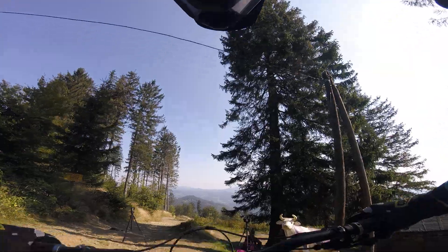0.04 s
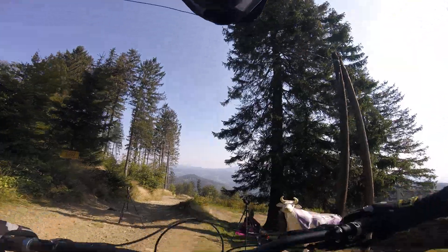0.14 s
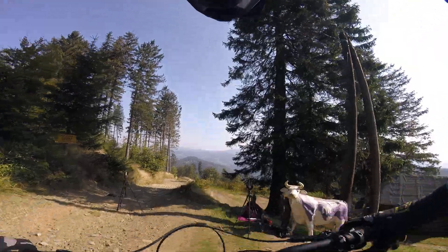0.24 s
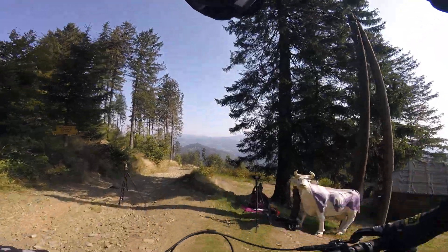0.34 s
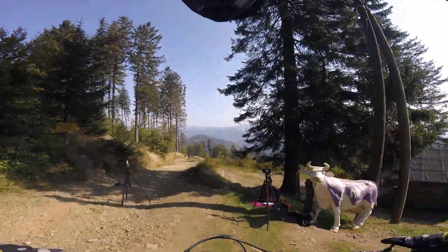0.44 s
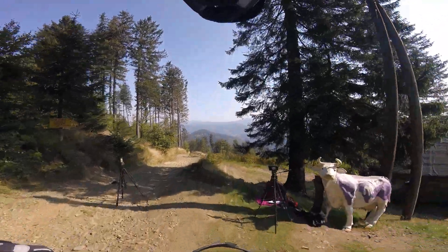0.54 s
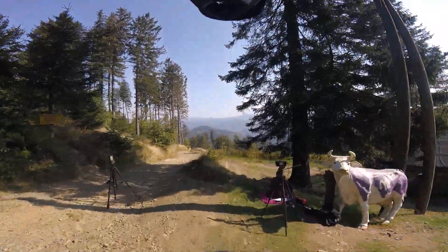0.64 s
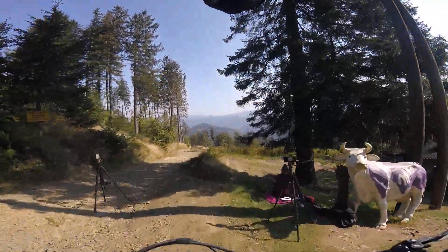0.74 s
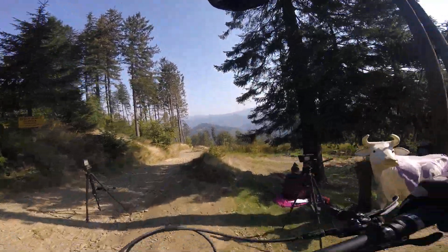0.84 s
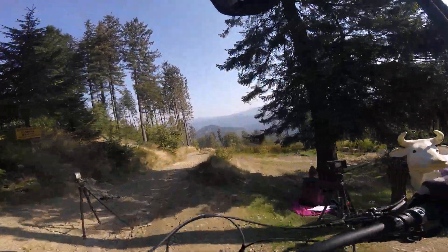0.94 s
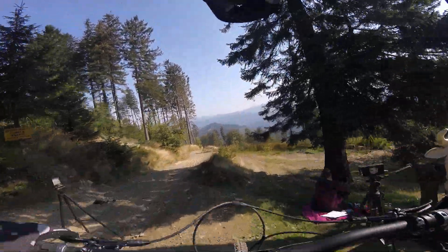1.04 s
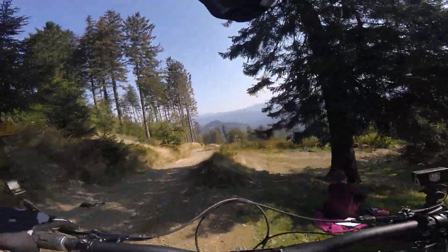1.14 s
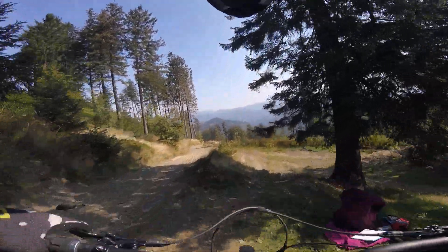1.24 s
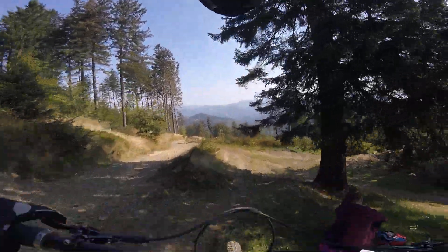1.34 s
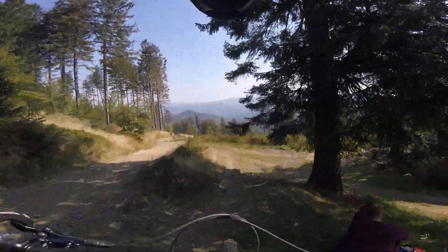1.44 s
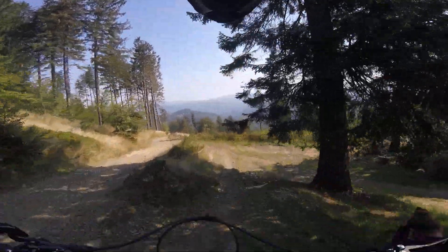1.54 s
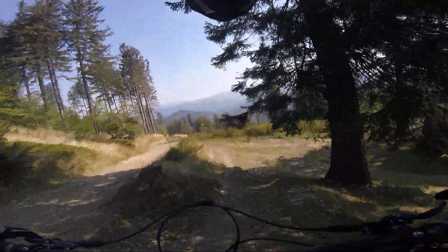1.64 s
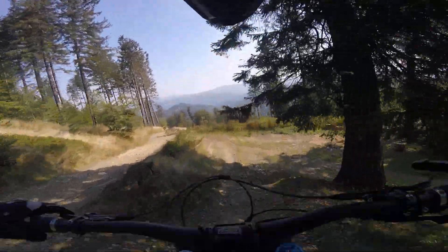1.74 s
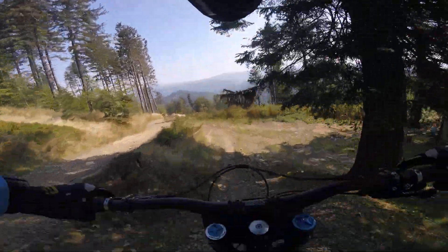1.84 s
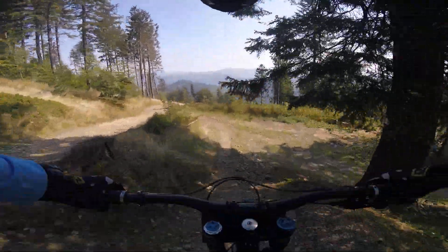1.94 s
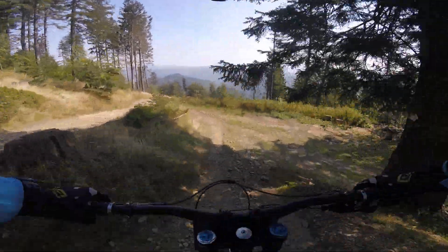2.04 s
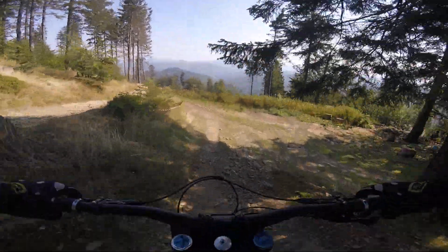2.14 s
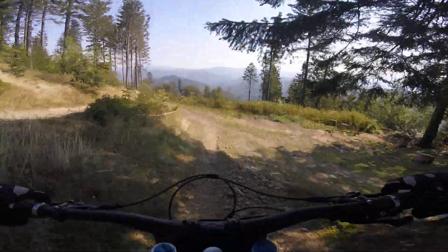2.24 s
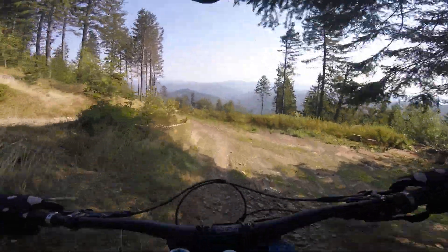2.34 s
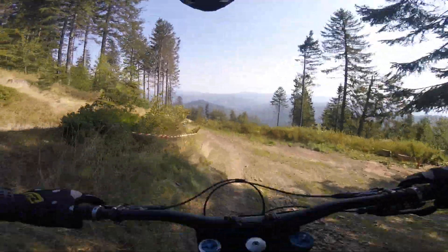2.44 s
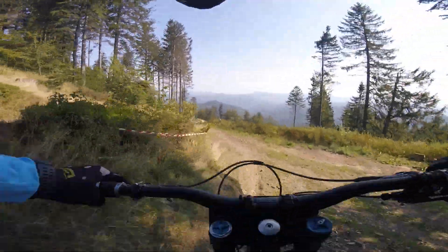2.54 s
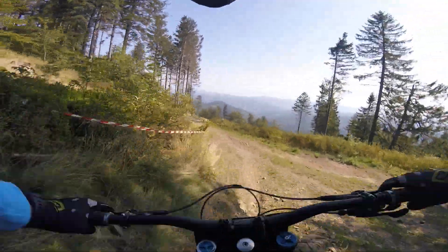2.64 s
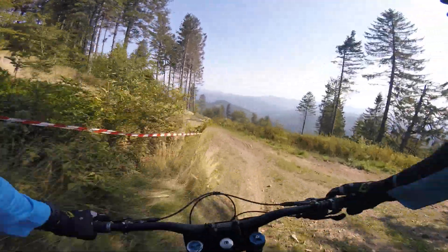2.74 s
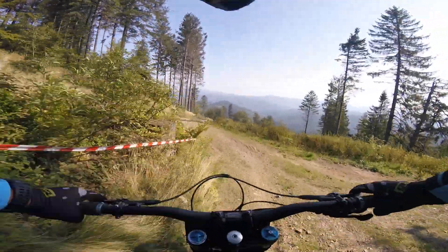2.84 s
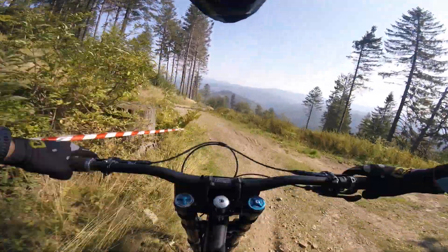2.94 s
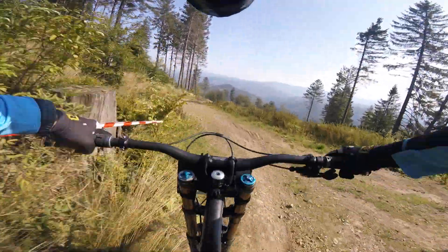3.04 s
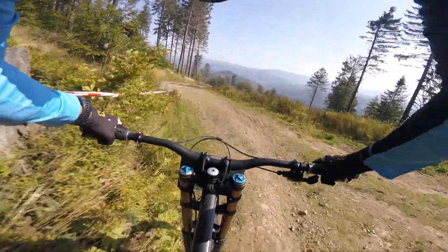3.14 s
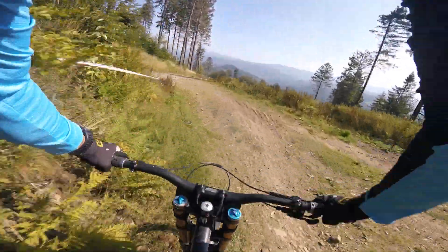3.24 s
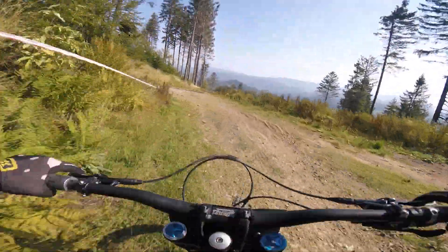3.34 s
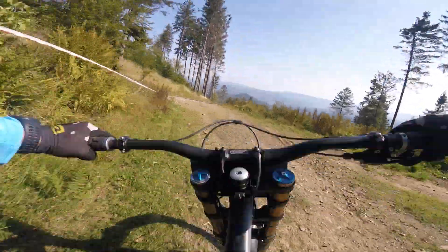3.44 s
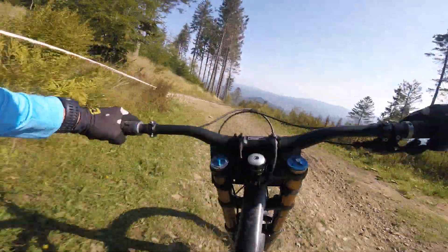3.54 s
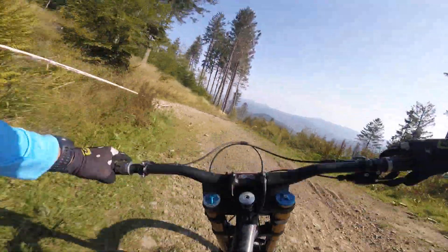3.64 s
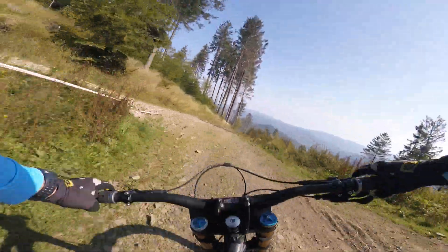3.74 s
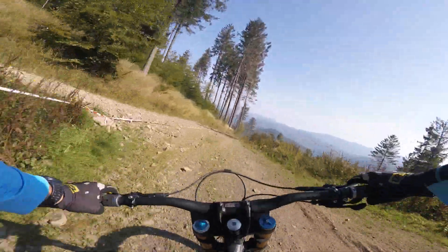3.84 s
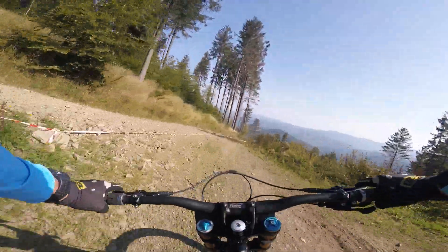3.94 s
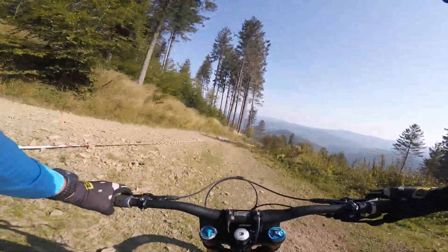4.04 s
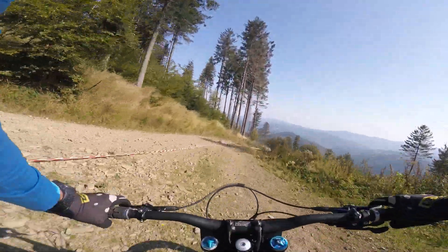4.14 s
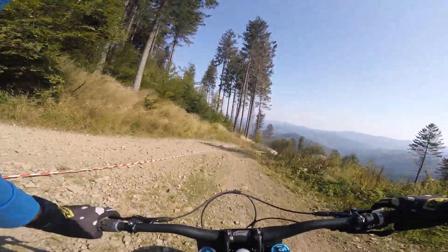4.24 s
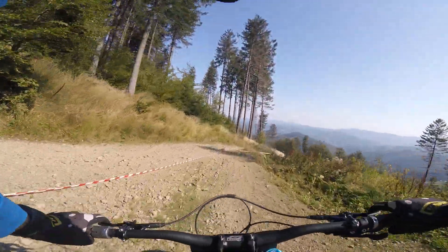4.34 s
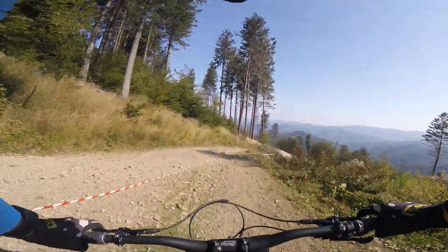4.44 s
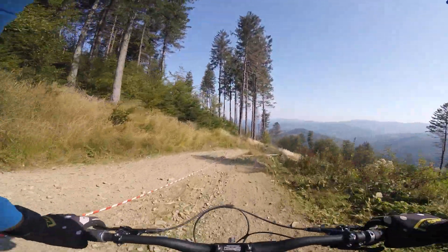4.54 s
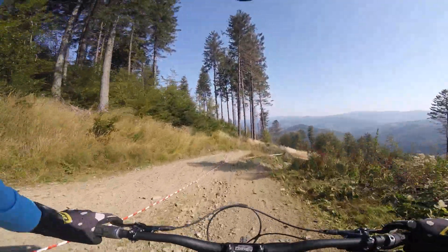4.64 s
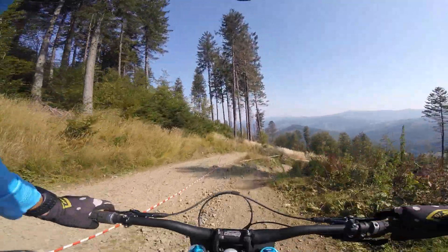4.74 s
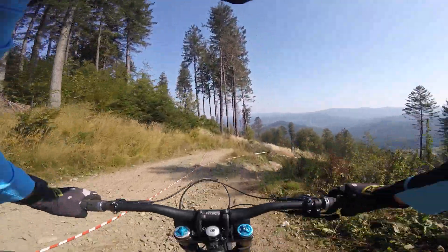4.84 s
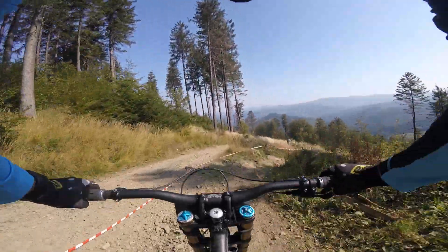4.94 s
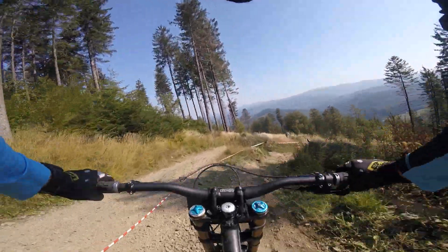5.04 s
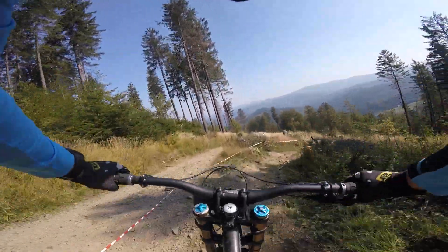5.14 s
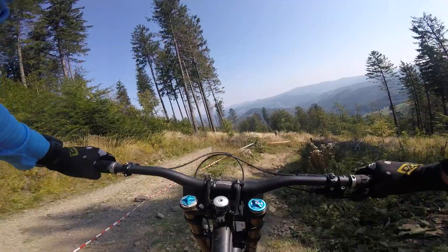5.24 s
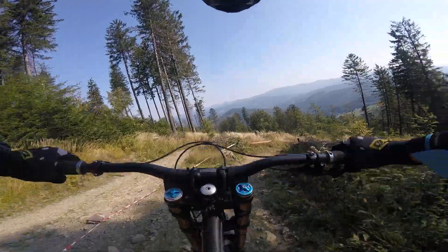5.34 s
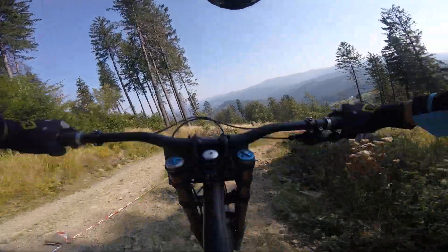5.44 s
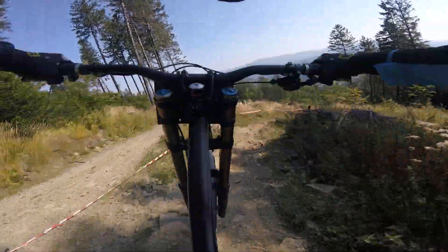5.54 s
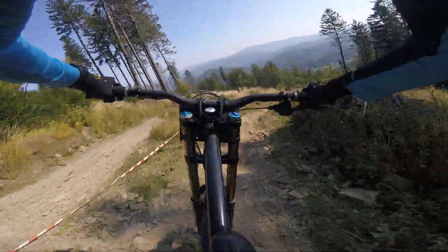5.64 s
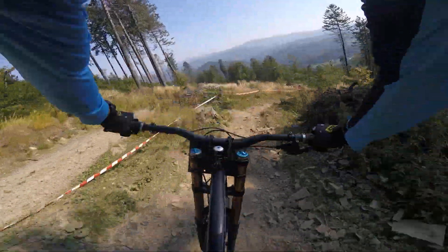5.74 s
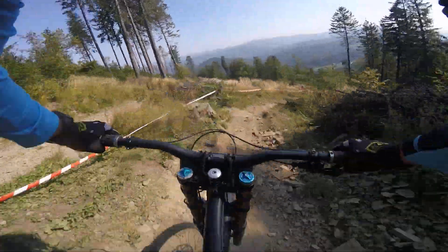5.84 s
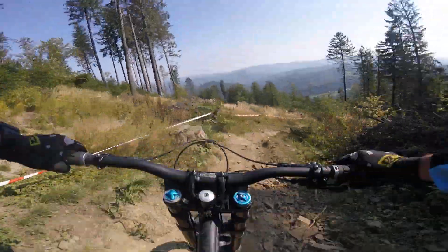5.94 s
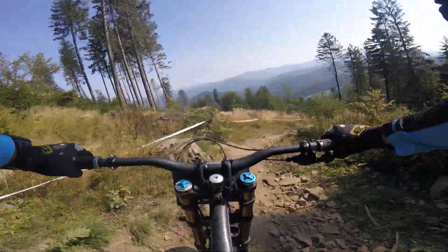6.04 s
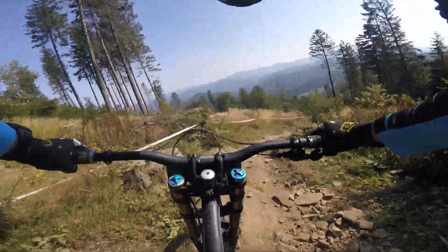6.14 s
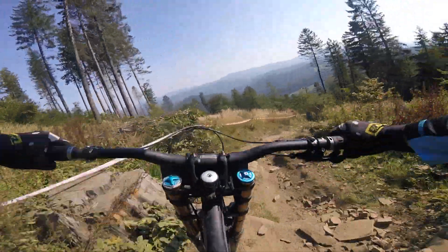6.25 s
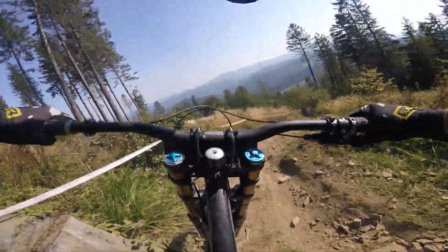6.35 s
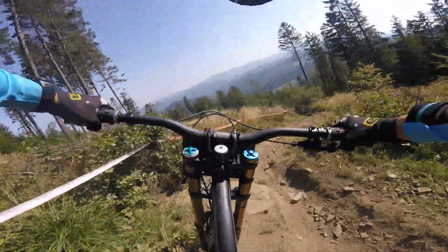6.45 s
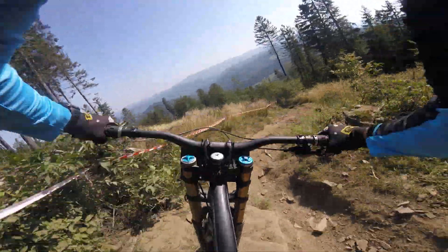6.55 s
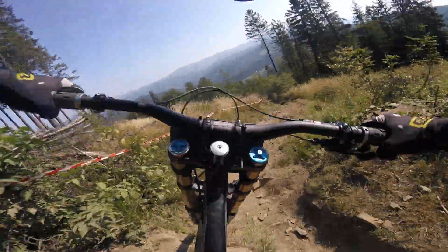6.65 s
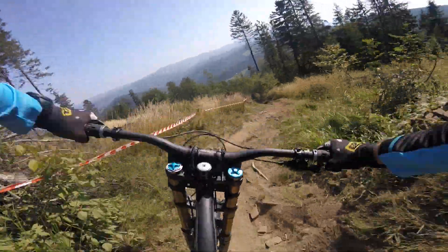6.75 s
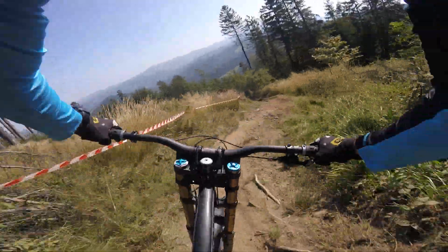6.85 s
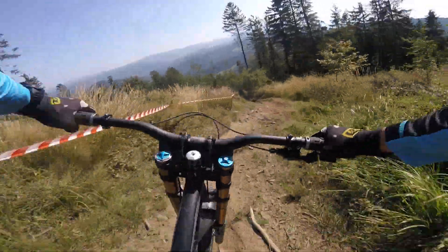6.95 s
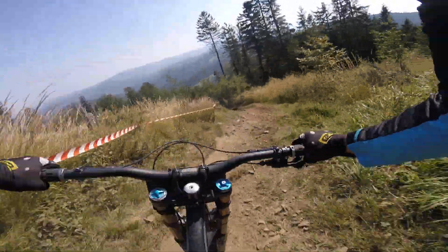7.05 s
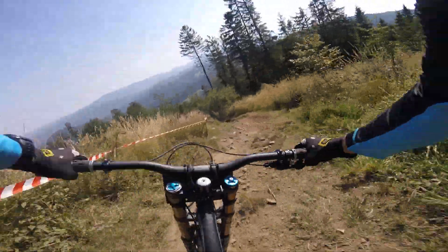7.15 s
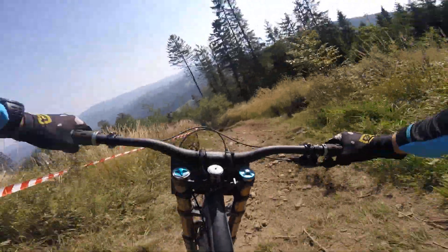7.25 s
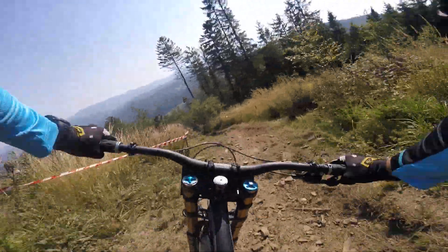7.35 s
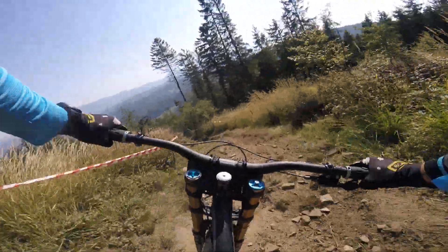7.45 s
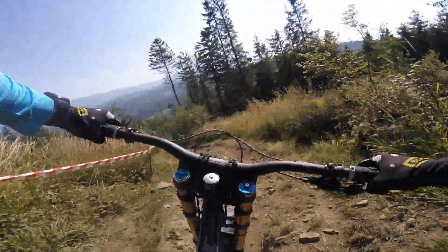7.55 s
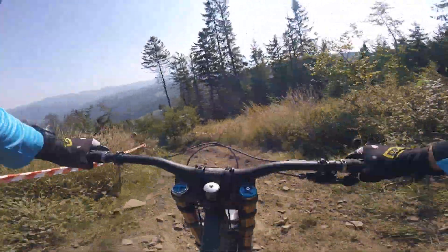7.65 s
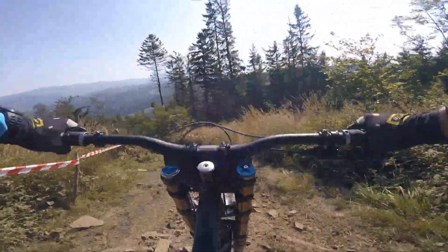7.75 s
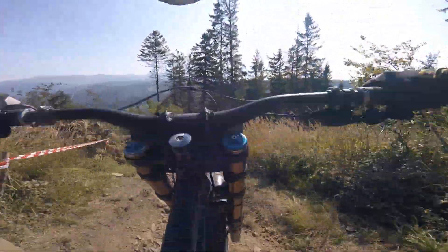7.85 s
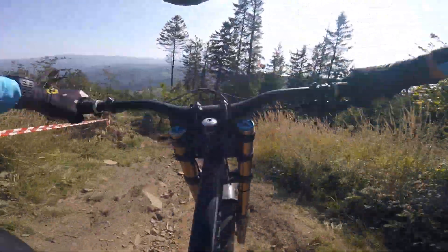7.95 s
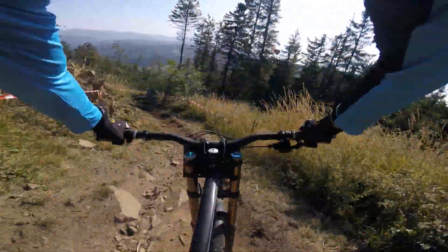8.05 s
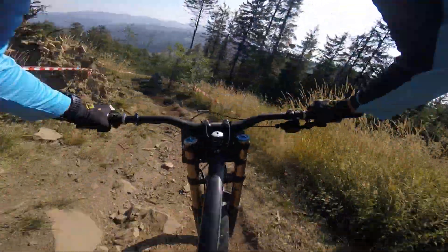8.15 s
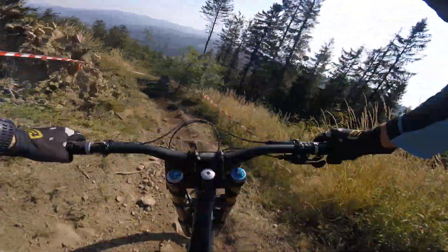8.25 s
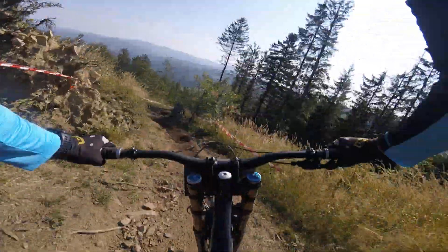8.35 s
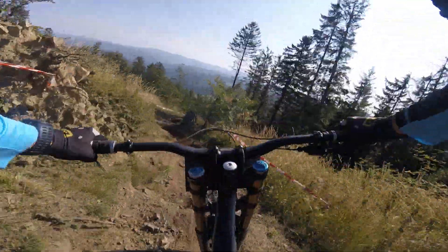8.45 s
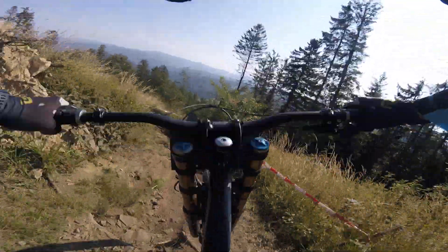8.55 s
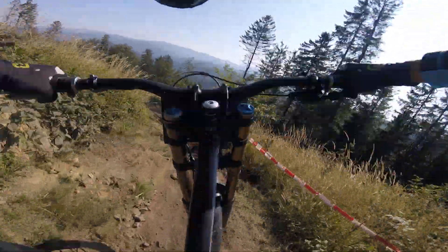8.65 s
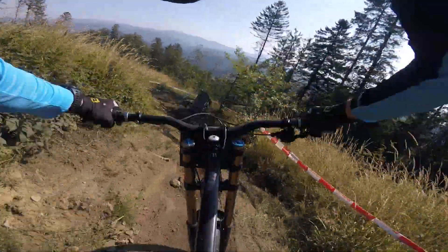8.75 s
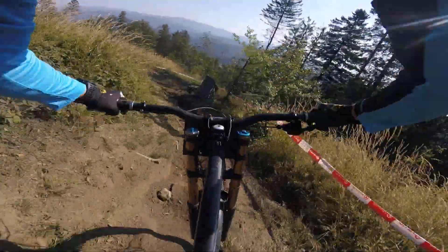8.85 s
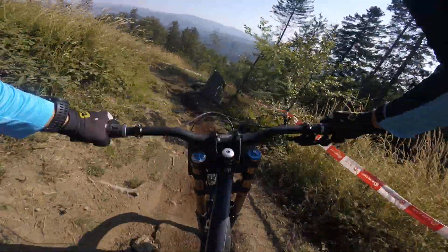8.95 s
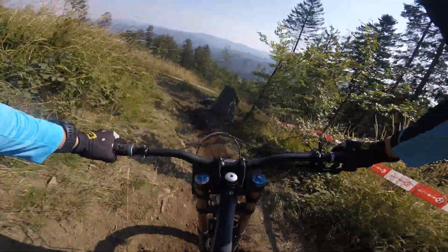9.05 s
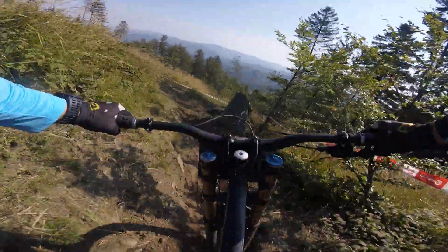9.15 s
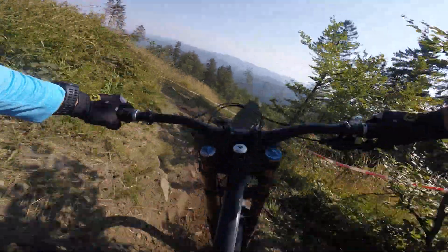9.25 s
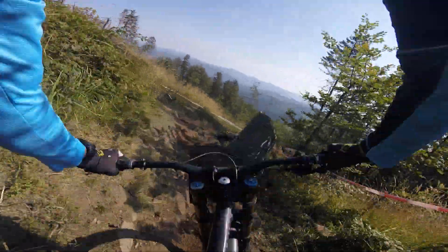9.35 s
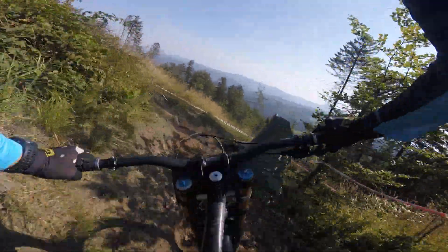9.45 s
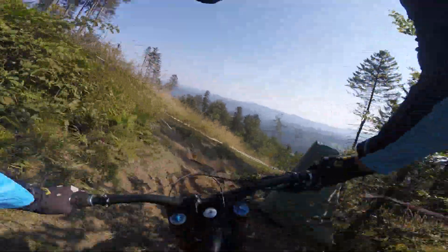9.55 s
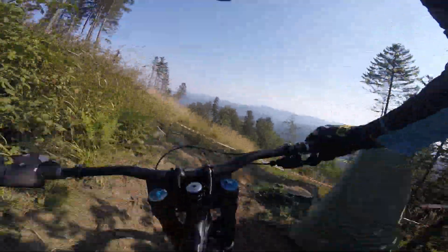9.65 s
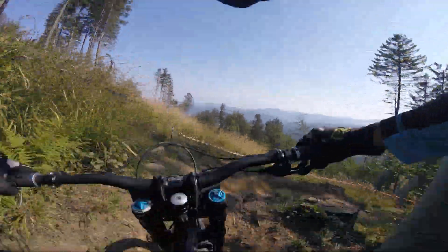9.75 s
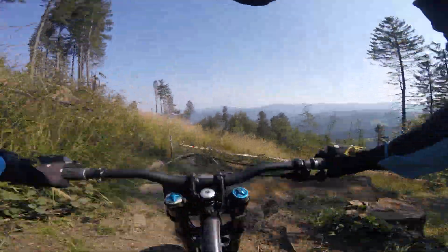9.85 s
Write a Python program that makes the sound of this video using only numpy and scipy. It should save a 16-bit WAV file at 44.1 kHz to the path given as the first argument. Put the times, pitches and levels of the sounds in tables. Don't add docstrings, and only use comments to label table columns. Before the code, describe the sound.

Rattling downhill bike ride: a soft rolling start with freewheel ticks, then hard knocks, clinking chain, drumming tyres and heavy low wind rumble.

```python
import sys
import numpy as np
from scipy import signal
from scipy.fft import rfft, irfft, next_fast_len
from scipy.io import wavfile
from scipy.ndimage import uniform_filter1d, minimum_filter1d

SR = 44100
rng = np.random.default_rng(int(sys.argv[2]) if len(sys.argv) > 2 else 0)


def voltage_ratio(level):
    return 10 ** (np.asarray(level, float) / 20)


def file_out(sig):
    cols = np.atleast_2d(sig).T
    lim = np.clip(cols, -1, 1)
    pcm = np.round(lim * 32767).astype(np.int16)
    wavfile.write(sys.argv[1], SR, pcm)


N = 436590


def evened(x):
    return x / np.sqrt(np.mean(x ** 2) + 1e-20)


def curve(rows, column):
    rows = np.asarray(rows)
    return np.interp(np.arange(N) / SR, rows[:, 0], rows[:, column])


def coloured(x, spectrum):
    size = next_fast_len(N)
    freq_hz, level_db = np.transpose(spectrum)
    bins_hz = np.fft.rfftfreq(size, 1 / SR)
    shape_db = np.interp(np.log(bins_hz + 1), np.log(freq_hz + 1), level_db, -90, -90)
    return evened(irfft(rfft(x, size) * voltage_ratio(shape_db), size)[:N])


def flicker(per_s):
    steps = rng.standard_normal(4000)
    return np.interp(np.arange(N) / SR * per_s, np.arange(4000), steps) * 1.23


def grit(per_s, spread_db, tail_s):
    size = voltage_ratio(spread_db * np.minimum(rng.exponential(1, N), 4))
    hits = size * (rng.random(N) < per_s / SR)
    return signal.lfilter([1], [1, -np.exp(-1 / (tail_s * SR))], hits)


def band(x, centre_hz, width):
    low_hz = centre_hz / (1 + width)
    high_hz = min(centre_hz * (1 + width), 0.45 * SR)
    return signal.sosfilt(signal.butter(2, [low_hz, high_hz], "bandpass", fs=SR, output="sos"), x)


def add(mix, start_s, sound, peak_db):
    part = mix[round(start_s * SR):][:len(sound)]
    part += voltage_ratio(peak_db) * (sound / abs(sound).max())[:len(part)]


# start_s [s], gust_db [dB], drum_db [dB]
RIDE = [(0.0, -35.5, -32), (0.63, -31, -38), (0.8, -25, -31), (0.99, -27, -37.5), (1.6, -18, -27.5),
        (2.18, -17.5, -16.5), (2.59, -13, -15), (3.06, -16, -17.5), (3.08, -14, -4), (3.2, -22, -29),
        (3.25, -22, -6), (3.36, -15.5, -34), (3.47, -22.5, -19), (3.67, -15.5, -15), (3.69, -20, -19),
        (4.38, -13.5, -15.5), (4.52, -16, -15.5), (4.6, -14, -16.5), (5.27, -9.5, -19.5), (5.65, -19, -17),
        (5.71, -9, -25.5), (6.4, -14, -25.5), (6.81, -12.5, -21.5), (7.17, -12, -32), (7.25, -11, -9),
        (7.44, -13, -24), (8.05, -11.5, -23), (8.13, -8, -23), (8.22, -10, -29), (8.3, -15.5, -8),
        (8.43, -13, -30), (8.55, -18.5, -18.5), (8.6, -10, -20), (8.66, -20, -34), (8.71, -12, -15),
        (8.88, -11.5, -26), (8.93, -19.5, -27), (9.18, -14, -34), (9.26, -19.5, -21.5), (9.4, -9.5, -35),
        (9.48, -20, -21), (9.57, -13, -29), (9.9, -13.5, -38)]
# start_s [s], crunch_db [dB], fizz_db [dB]
TRAIL_SURFACE = [(0.0, -52, -59), (0.44, -59.5, -63.5), (0.66, -49, -61), (0.93, -50.5, -59),
                 (1.07, -43, -52), (1.18, -48, -57.5), (1.46, -41.5, -53.5), (1.76, -46.5, -55.5),
                 (2.07, -38.5, -51.5), (2.23, -40, -55.5), (2.34, -35, -49), (2.53, -36, -49),
                 (2.76, -30, -46.5), (2.89, -36, -46.5), (3.03, -38.5, -50.5), (3.22, -46.5, -61),
                 (3.45, -43, -52.5), (3.69, -36.5, -50.5), (4.0, -41.5, -51.5), (4.3, -39, -48),
                 (4.63, -37, -49.5), (4.99, -36, -48.5), (5.35, -28, -47), (5.54, -33, -49),
                 (5.73, -32, -48), (6.01, -33, -51), (6.15, -35, -51), (6.64, -36, -51.5),
                 (6.84, -36.5, -51), (7.5, -32, -50), (7.69, -32, -49), (8.0, -35, -47), (8.11, -36, -52),
                 (8.38, -36, -52), (8.68, -34, -49), (9.13, -35.5, -50), (9.23, -33.5, -49.5),
                 (9.43, -33, -50.5), (9.57, -36, -50.5), (9.9, -37.5, -51)]
# start_s [s], ticks_per_s [1/s]
PAWL_RATE = [
    (0, 28),
    (2.5, 59),
    (4.2, 67),
    (4.7, 72),
    (5.1, 63),
    (9.9, 75),
]
# freq_hz [Hz], level_db [dB per Hz]
DRUM_SPECTRUM = [(26, -27), (45, -3), (76, -1.5), (221, -11.5), (280, -17), (373, -19), (519, -28),
                 (702, -35), (1200, -39), (1560, -54), (2640, -120)]
# freq_hz [Hz], level_db [dB per Hz]
CRUNCH_SPECTRUM = [(260, -12), (450, -1.5), (521, -2), (706, -10), (957, -8), (1220, -9), (1450, -11),
                   (1670, -11.5), (1850, -8), (2280, -11), (2960, -18.5), (3850, -20.5), (4320, -26.5),
                   (5500, -31), (7150, -74), (12100, -120)]
# freq_hz [Hz], level_db [dB per Hz]
FIZZ_SPECTRUM = [(1760, -34), (3000, -2.5), (3860, -6.5), (4260, -9.5), (6040, -5.5), (10300, -14.5),
                 (11900, -28.5), (14900, -22), (15600, -38), (16000, -55)]


def tyres():
    jolts = evened(grit(per_s=70, spread_db=7, tail_s=0.0073))
    sway = flicker(22)
    tick_phase = np.cumsum(curve(PAWL_RATE, 1)) / SR % 1
    ticking = np.exp(-tick_phase / 0.24)
    low, middle, high = rng.standard_normal((3, N))
    drum = coloured(low * (1 + 0.8 * jolts) * voltage_ratio(2.93 * sway), DRUM_SPECTRUM)
    crunch = coloured(middle * (1 + 0.85 * jolts + 0.33 * ticking) * voltage_ratio(2.5 * sway), CRUNCH_SPECTRUM)
    fizz = coloured(high * (1 + 0.78 * jolts + 0.83 * ticking) * voltage_ratio(2.3 * sway), FIZZ_SPECTRUM)
    out = voltage_ratio(curve(RIDE, 2) - 0.05) * drum
    out += voltage_ratio(curve(TRAIL_SURFACE, 1) + 5.5) * crunch
    out += voltage_ratio(curve(TRAIL_SURFACE, 2) + 2) * fizz
    return out


# start_s [s], peak_db [dB], pitch_hz [Hz], t60_s [s]
BUMP_HITS = [(1.242, -16.5, 132, 0.05), (1.615, -12.5, 109, 0.05), (1.938, -8.5, 154, 0.05),
             (2.449, -12, 200, 0.053), (2.5, -10, 128, 0.057), (2.802, -3.5, 231, 0.067),
             (3.009, -7, 111, 0.055), (3.081, 3, 181, 0.058), (3.234, -3.5, 136, 0.034),
             (3.394, -18, 110, 0.05), (3.654, -19, 110, 0.05), (3.653, -4.5, 152, 0.05),
             (3.731, -12, 124, 0.05), (4.308, -5.5, 183, 0.056), (4.732, -8.5, 159, 0.064),
             (4.807, -15.5, 237, 0.05), (4.845, -7.5, 110, 0.05), (5.373, -5, 135, 0.05),
             (5.657, -9, 167, 0.05), (5.839, -2.5, 295, 0.05), (6.625, -11, 178, 0.05),
             (6.679, -14, 143, 0.05), (7.245, -4, 119, 0.05), (7.301, -7, 161, 0.05),
             (7.802, -7.5, 250, 0.046), (8.277, -13, 164, 0.05)]


def bumps():
    out, t = np.zeros(N), np.arange(6000) / SR
    for start_s, peak_db, pitch_hz, t60_s in BUMP_HITS:
        turns = pitch_hz * (t + 0.0015 * (1 - np.exp(-t / 0.0044)))
        swell = np.minimum(t / 0.0042, 1) * voltage_ratio(-60 * t / max(t60_s, 0.01))
        add(out, start_s, swell * np.sin(2 * np.pi * turns), peak_db)
    return out


# start_s [s], peak_db [dB], pitch_hz [Hz], t60_s [s]
FRAME_HITS = [(1.002, -22.5, 1800, 0.037), (1.022, -28, 3340, 0.033), (1.155, -29, 3620, 0.03),
              (1.244, -17.5, 760, 0.03), (1.376, -15.5, 1670, 0.032), (1.508, -18.5, 3050, 0.038),
              (1.674, -21.5, 1300, 0.03), (1.811, -29, 783, 0.03), (2.068, -18, 594, 0.03),
              (2.069, -15.5, 1780, 0.056), (2.102, -18.5, 1890, 0.03), (2.286, -23, 673, 0.03),
              (2.397, -17, 2040, 0.038), (2.667, -15, 961, 0.03), (2.812, -16, 807, 0.028),
              (2.856, -16, 1850, 0.03), (3.007, -20, 2050, 0.03), (3.087, -10.5, 649, 0.037),
              (3.101, -21.5, 820, 0.023), (3.238, -11, 594, 0.021), (3.248, -5.5, 587, 0.03),
              (3.657, -9, 660, 0.033), (3.855, -16, 970, 0.033), (5.173, -21.5, 1110, 0.035),
              (5.258, -14.5, 1040, 0.023), (5.336, -11, 760, 0.03), (5.442, -10, 760, 0.022),
              (5.53, -20, 705, 0.03), (5.63, -21, 729, 0.03), (5.692, -11, 1250, 0.027),
              (5.838, 2, 654, 0.034), (5.909, -23, 1700, 0.03), (5.993, -19, 1880, 0.03),
              (6.171, -16, 950, 0.033), (6.36, -14.5, 1190, 0.036), (6.382, -23, 953, 0.03),
              (6.581, -24, 735, 0.03), (6.672, -14, 830, 0.03), (7.012, -18.5, 915, 0.032),
              (7.059, -18, 1390, 0.03), (7.247, -5.5, 604, 0.025), (7.35, -14.5, 910, 0.03),
              (7.427, -24, 907, 0.03), (7.447, -13.5, 1800, 0.028), (7.667, -16, 1280, 0.035),
              (7.81, -12, 940, 0.032), (7.894, -16.5, 1220, 0.03), (8.07, -22, 703, 0.03),
              (8.106, -17.5, 820, 0.035), (8.255, -18.5, 1900, 0.034), (8.305, -12, 1870, 0.038),
              (8.52, -22, 1630, 0.035), (8.535, -15.5, 929, 0.03), (8.604, -9, 1500, 0.033),
              (8.706, -34, 2230, 0.026), (8.724, -26, 2060, 0.03), (8.792, -13, 1350, 0.03),
              (8.992, -21, 832, 0.03), (9.148, -16, 1650, 0.037), (9.267, -22, 622, 0.03),
              (9.299, -13, 929, 0.03), (9.478, -16, 767, 0.033), (9.639, -24, 1860, 0.03),
              (9.748, -17, 1290, 0.03), (9.816, -17.5, 1900, 0.038)]


def knocks():
    out, t = np.zeros(N), np.arange(4000) / SR
    for start_s, peak_db, pitch_hz, t60_s in FRAME_HITS:
        noise = rng.standard_normal(len(t))
        swell = np.minimum(t / 0.0013, 1) * voltage_ratio(-60 * t / max(t60_s, 0.004))
        add(out, start_s, band(noise * swell, pitch_hz, 0.49), peak_db)
    return out


# start_s [s], peak_db [dB], pitch_hz [Hz], ring_share [0-1]
CHAIN_HITS = [(0.7458, -32, 4570, 0.5), (0.859, -39, 3050, 0.4), (1.0025, -27, 3350, 0.4),
              (1.0224, -10.5, 8070, 0.53), (1.1563, -23, 3240, 0.27), (1.1566, -17, 6710, 0.65),
              (1.2445, -24, 2980, 0.2), (1.3349, -29, 5160, 0.5), (1.3762, -24, 3190, 0.2),
              (1.4447, -29, 3100, 0.3), (1.508, -18, 3000, 0.5), (1.5085, -42, 3130, 0.4),
              (1.554, -24, 3480, 0.4), (1.6747, -26, 3170, 0.5), (1.7295, -35, 5130, 0.4),
              (1.8123, -25.5, 3310, 0.3), (2.0139, -28, 3180, 0.4), (2.0613, -31, 3220, 0.4),
              (2.1775, -39, 3210, 0.4), (2.233, -26, 3590, 0.3), (2.339, -20.5, 6440, 0.8),
              (2.4938, -35, 3070, 0.4), (2.5352, -26, 3190, 0.4), (2.593, -26, 3560, 0.4),
              (2.6687, -18, 3190, 0.4), (2.7273, -21.5, 3090, 0.4), (2.8126, -30, 4150, 0.4),
              (2.829, -12, 3850, 0.35), (2.856, -24, 3580, 0.4), (3.286, -30, 5100, 0.2),
              (3.5808, -36, 3220, 0.4), (3.5933, -25, 3410, 0.4), (4.5052, -31, 3940, 0.4),
              (5.2979, -34, 3070, 0.4), (5.3947, -17.5, 3000, 0), (5.395, -24, 3250, 0.4),
              (5.422, -24, 3380, 0.4), (5.4416, -17, 3750, 0.4), (5.461, -14, 3040, 0.4),
              (5.533, -27, 3010, 0.4), (5.6297, -26, 4050, 0.4), (5.8156, -28, 3130, 0.4),
              (5.841, -25, 3330, 0.44), (6.0058, -18.5, 3210, 0.45), (6.201, -24, 3850, 0.5),
              (6.263, -29, 3840, 0.4), (6.357, -31, 3210, 0.4), (6.557, -28, 3770, 0.4),
              (6.5815, -27, 3940, 0.5), (6.7741, -36, 3130, 0.4), (7.239, -18.5, 3840, 0.6),
              (7.3715, -18.5, 3320, 0.4), (7.3937, -25, 3700, 0.4), (7.446, -22, 4290, 0.4),
              (7.4645, -16.5, 3330, 0.3), (7.666, -27, 3000, 0.4), (7.8207, -24.5, 3390, 0.4),
              (7.893, -18, 3180, 0.2), (7.9419, -23, 3080, 0.4), (8.107, -14, 3520, 0.2),
              (8.1445, -26, 4860, 0.3), (8.306, -29, 3020, 0.4), (8.3445, -23, 3000, 0.4),
              (8.5505, -31, 3110, 0.4), (8.6042, -17, 3400, 0.3), (8.806, -22, 3670, 0.3),
              (8.8259, -20, 4190, 0.4), (8.963, -35, 3280, 0.4), (8.998, -27, 3260, 0.4),
              (9.1098, -28, 3210, 0.5), (9.1477, -25, 3780, 0.4), (9.3008, -24, 3750, 0.4),
              (9.585, -21.5, 3200, 0.5), (9.816, -32, 3760, 0.5), (9.875, -24.5, 3420, 0.45)]
# freq_hz [Hz], level_db [dB], t60_s [s]
LINK_MODES = [
    (3860, 10, 0.022),
    (6680, 5.5, 0.033),
    (8110, 9.5, 0.017),
    (9400, -6, .045),
    (14100, -10, .03),
]


def chain():
    out, t = np.zeros(N), np.arange(2600) / SR
    for start_s, peak_db, pitch_hz, ring_share in CHAIN_HITS:
        noise = rng.standard_normal(len(t))
        crack = evened(band(noise * voltage_ratio(-60 * t / 0.023), pitch_hz, 0.68))
        links = np.zeros(len(t))
        for k, (freq_hz, level_db, t60_s) in enumerate(LINK_MODES):
            phase = 9 * noise[k]
            links += voltage_ratio(level_db - 60 * t / t60_s) * np.sin(2 * np.pi * freq_hz * t + phase)
        add(out, start_s, crack + 1.53 * np.clip(ring_share, 0, 1) * evened(links), peak_db)
    return out


# freq_hz [Hz], level_db [dB per Hz]
GUST_SPECTRUM = [(4.7, -29), (8.0, -2), (32, 4), (92, -14), (300, -23.5), (390, -34), (660, -120)]


def wind():
    lumps = coloured(rng.standard_normal(N), GUST_SPECTRUM) * voltage_ratio(1.72 * flicker(9))
    return voltage_ratio(curve(RIDE, 1) + 1.85) * evened(lumps)


def scene():
    return (tyres() + bumps() + knocks() + chain() + wind())[None]


def top_cut(x):
    return signal.sosfilt(signal.butter(12, 16100, fs=SR, output="sos"), x)


def record(dry):
    held_peak = -minimum_filter1d(-abs(dry), 500)
    peak_db = 20 * np.log10(held_peak + 1e-9)
    over_db = uniform_filter1d(np.maximum(peak_db + 1.5, 0), 500)
    limited = dry / voltage_ratio(0.71 * over_db)
    mix = 1.094 * np.tanh(limited / 1.104)
    return top_cut(mix)


dry = scene()
out = record(dry)
file_out(out)
```